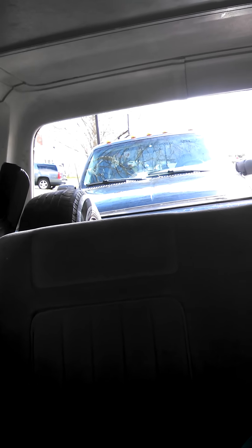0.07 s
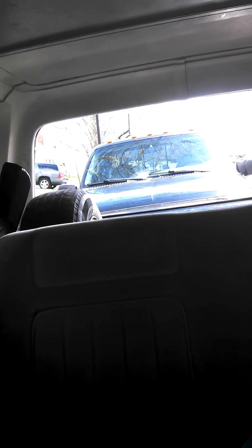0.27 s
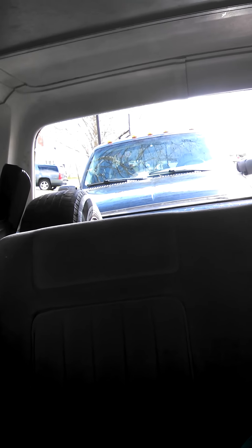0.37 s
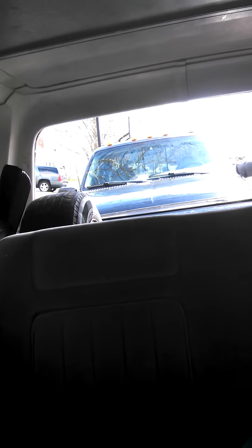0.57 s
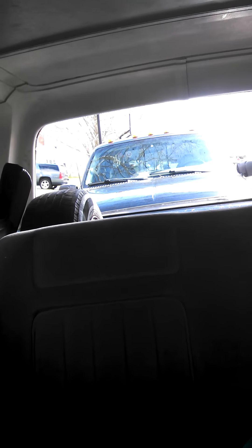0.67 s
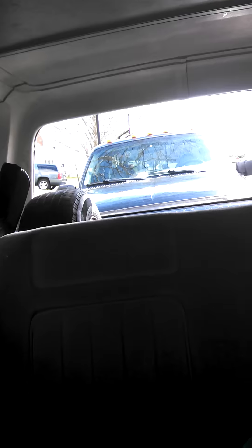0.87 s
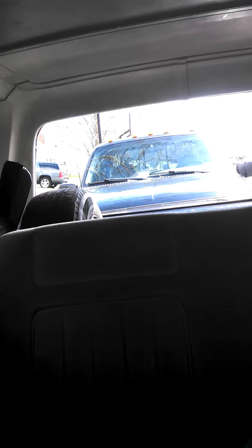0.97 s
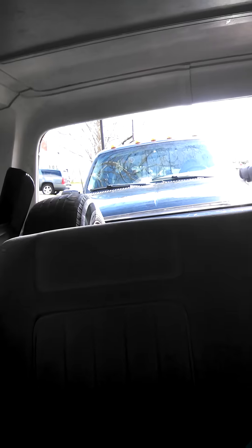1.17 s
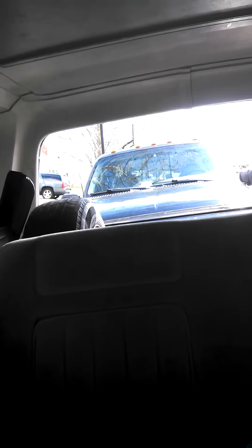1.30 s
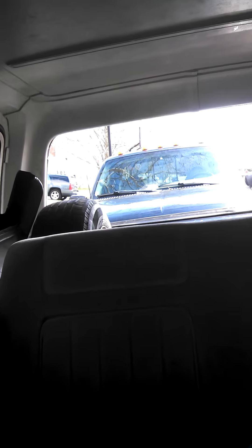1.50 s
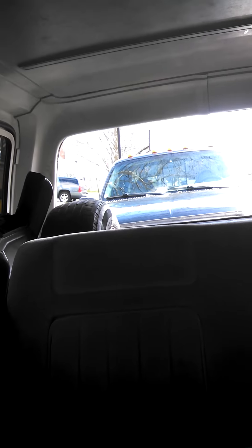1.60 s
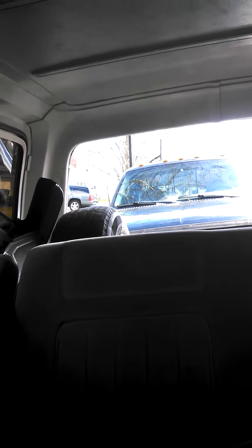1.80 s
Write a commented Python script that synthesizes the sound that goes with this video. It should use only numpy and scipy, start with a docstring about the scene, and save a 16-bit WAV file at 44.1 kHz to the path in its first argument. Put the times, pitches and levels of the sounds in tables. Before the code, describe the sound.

An engine runs at a fast idle throughout, a low, throbbing drone heard inside a standing vehicle, with faint hiss, a slight whirr and soft rustles. At about 0.5 seconds a small hard catch clicks sharply. A lighter tick follows near 0.9 seconds, then a louder click at about 1.2 seconds. The rumble dips after it and creeps back, with a few faint ticks, until nearly 2 seconds.

```python
"""Inside a standing vehicle, the engine runs at a fast idle: its periodic firing gives a low, throbbing
drone of harmonics over cabin rumble, faint hiss and a whirr. Something small and hard, like a catch,
clicks twice among light ticks and soft rustles; each impact excites the damped modes of catch and panel
and scatters round the cabin. The louder second click makes the recorder's gain control duck the rumble,
which then creeps back."""
import sys
import numpy as np
from scipy import signal
from scipy.fft import rfft, irfft, next_fast_len
from scipy.io import wavfile

SR = 44100
rng = np.random.default_rng(int(sys.argv[2]) if len(sys.argv) > 2 else 0)


def pcm_store(signal):
    """Save signal as 16-bit PCM."""
    levels = np.round(np.clip(np.atleast_2d(signal), -1, 1) * 32767)
    wavfile.write(sys.argv[1], SR, levels.astype(np.int16).T)


N = 81585
T = np.arange(N) / SR

# Engine firing rate: time_s, rate_hz
FIRING_RATE = [(0, 65.9), (.24, 63.22), (.32, 63.4), (.4, 64.4), (.5, 62.6), (.64, 64.47), (.8, 64.84),
               (.88, 66.65), (.99, 64.28), (1.12, 66.08), (1.23, 63.18), (1.36, 66.12), (1.47, 64.17),
               (1.6, 66.62), (1.74, 65.71), (1.85, 67.4)]
# Firing harmonics: time_s, first_db, second_db, third_db
HARMONIC_LEVELS = [(0, -60, -45.5, -67), (.1, -43.5, -42.5, -45.5), (.2, -48.5, -43.5, -58.5),
                   (.34, -40, -36.5, -53), (.44, -45.5, -41.5, -51), (.51, -40.5, -37.5, -47.5),
                   (.6, -45.5, -37.5, -47), (.68, -45, -44, -45), (.82, -41.5, -42, -45),
                   (.92, -44, -43.5, -47.5), (1.07, -40.5, -41.5, -45.5), (1.16, -41, -43, -38),
                   (1.23, -45.5, -42.5, -54), (1.46, -45.5, -45.5, -47.5), (1.57, -42, -44, -48),
                   (1.66, -46, -47.5, -48.5), (1.82, -43.5, -42, -45)]
# Their balance, left minus right: first_db, second_db, third_db
HARMONIC_PAN_DB = [7, 4, -7]
# Weaker engine tones: crank_multiple, level_db, left_minus_right_db
CRANK_ORDERS = [(4, -56.5, 0.5), (5, -54.5, -2.5), (10, -53.5, 5.5), (11, -57.5, -2), (13, -60.5, -9),
                (15, -63.5, 4.5), (17, -59, 5.5), (20, -64, 1), (21, -69.5, 11.5)]
# Phase between the ears in the cabin's standing waves: frequency_hz, left_lead_rad
STANDING_WAVE_LEAD = [(64, 1.0), (105, -0.87), (130, -1.14), (200, -1.29), (400, -1.38)]
# Likeness of the cabin's noise at the two ears: frequency_hz, correlation
EAR_CORRELATION = [(60, 0.89), (150, 0.69), (300, -0.059), (600, 0.31), (1050, 0.76), (1550, 0.98),
                   (2200, -0.7), (4000, 0.23), (8000, -0.13), (12000, -0.15)]
# Envelopes of rumble and whirr: time_s, gain_db
RUMBLE_ENVELOPE = [(0, 0), (.2, 0.5), (.45, 4.5), (.6, 0), (.8, 2.5), (1.0, 3.5), (1.15, 5), (1.3, 3),
                   (1.6, 0), (1.85, 1)]
WHIRR_ENVELOPE = [(0, -60), (.05, -73), (.08, -60), (.15, -70), (.25, -61.5), (.35, -56), (.5, -53.5),
                  (.65, -57.5), (.9, -67), (1.4, -68), (1.58, -60.5), (1.85, -65)]
# Thin whine within the whirr: time_s, pitch_hz
WHINE_GLIDE = [(0, 1290), (.3, 1345), (.48, 1391), (.75, 1335), (1.85, 1243)]
# Rubbing strokes: start_s, body_db, swish_db, length_s
RUSTLE_STROKES = [(0, -53, -64.5, .11), (.205, -68, -62, 0.042), (.27, -62, -67, 0.036),
                  (.445, -54, -60.5, 0.073), (0.562, -54.5, -71, .11), (.705, -53, -66, 0.065),
                  (0.774, -56.5, -78, 0.16), (0.922, -46.5, -55, .1), (1.011, -51.5, -63, 0.043),
                  (1.077, -49.5, -75, 0.11), (1.301, -55, -76, 0.059), (1.434, -62, -63.5, 0.033),
                  (1.543, -52, -66, 0.074), (1.62, -56, -82, 0.051), (1.694, -60, -62, 0.039),
                  (1.74, -62, -64, 0.06), (1.809, -53, -70, 0.064)]
# Impacts of the catch: start_s, ring_db, knock_db
IMPACTS = [(.5114, -11, -9.5), (.5137, -8, -9), (.5154, -17, -9.5), (.5173, -14, -9), (0.5223, -18, -21),
           (0.5292, -44, -23), (0.744, -45, -42), (.908, -53, -24.5), (.9224, -32, -15),
           (0.9453, -37, -25.5), (1.1705, 0, -6), (1.176, -20.5, -11), (1.181, -13, -10), (1.42, -47, -35),
           (1.572, -50, -31)]
# Modes of the catch and of the panel that carries it: pitch_hz, relative_db, t60_s
CATCH_MODES = [(8700, -28, .006), (12070, 1, .0062), (12450, -9, .011), (14220, -15, .012),
               (15300, -17, .009)]
PANEL_MODES = [(327, -32, .06), (517, -35, .06), (660, -31, .055), (860, -29, .075), (1360, -27, .06),
               (1500, -32, .04), (2060, -33, .035), (2480, -35, .04), (3596, -35, .05), (3984, -35, .06),
               (4290, -35, .06), (6826, -39, .04), (7320, -33, .045)]
# Spectral shapes of the noises: frequency_hz, relative_density_db
RUMBLE_SPECTRUM = [(15, -64.5), (28, -45), (36, -26), (48, 0.5), (100, 1), (160, -1.5), (230, 0.5),
                   (300, -1.5), (370, -3), (520, -12.5), (690, -10), (1000, -21), (1500, -26.5),
                   (2000, -27), (3000, -43)]
HISS_SPECTRUM = [(1500, 6), (2400, 2.5), (4000, 6), (6000, -.5), (7500, 0), (10500, -5), (15300, -3),
                 (16200, -19)]
WHIRR_SPECTRUM = [(700, -29), (1050, -3.5), (1250, 1), (1400, -1.5), (1560, 1), (1700, -13), (2100, -47)]
RUSTLE_BODY_SPECTRUM = [(150, 4), (400, 27), (750, 19), (1300, 8), (2200, -4), (4000, 7), (15000, -43.5)]
SWISH_SPECTRUM = [(1000, -3), (3000, -1.5), (7500, 2.5), (10500, -1), (15300, -5), (16500, -15)]
KNOCK_SPECTRUM = [(150, -14), (500, 11.5), (850, 1.5), (1400, 3.5), (1800, -4), (2400, -4), (4200, -3),
                  (6000, -6), (8000, -0.5), (15000, -4)]
RING_TAIL_SPECTRUM = [(9000, -39), (11000, -27), (12060, -1), (12500, -8), (13400, -20), (15200, -13),
                      (16500, -26.5)]

CONTACT_S, CATCH_PAN_DB = .0007, -3


def from_db(db):
    """Amplitude grows tenfold for every 20 decibels."""
    return 10 ** (np.asarray(db) / 20)


def unit_power(x):
    """Division by the root mean square gives unit power."""
    return x / np.sqrt(np.mean(x ** 2) + 1e-20)


def in_time(rows):
    """Linear interpolation in time."""
    return np.interp(T, *np.transpose(rows))


def at_hz(points, hz):
    """Interpolation on a logarithmic frequency axis."""
    frequencies, values = np.transpose(points)
    return np.interp(np.log(hz), np.log(frequencies), values)


def pan(db):
    """Interaural level difference: two gains, the left higher by db."""
    return from_db(np.array([[db], [-db]]) / 2)


def drift(rate_hz):
    """Random modulation: low-passed noise of unit power."""
    hop, settle = 40, 2000
    pole = np.exp(-2 * np.pi * hop * rate_hz / SR)
    white = rng.standard_normal(N // hop + settle + 2)
    slow = signal.lfilter([1], [1, -2 * pole, pole * pole], white)[settle:]
    return np.interp(np.arange(N) / hop, np.arange(len(slow)), unit_power(slow))


def noise(spectrum):
    """Partial coherence: mid and side noise mix to the cabin's correlation between the ears."""
    size = next_fast_len(N)
    hz = np.maximum(np.fft.rfftfreq(size, 1 / SR), 1)
    mid, side = rfft(rng.standard_normal((2, size)))
    alike = at_hz(EAR_CORRELATION, hz)
    ears = np.sqrt(1 + alike) * mid + np.sqrt(1 - alike) * side * [[1], [-1]]
    return unit_power(irfft(ears * from_db(at_hz(spectrum, hz)), size)[:, :N])


def tone(phase, depth, waver_hz=8.1):
    """Narrowband modulation: a random phasor makes a sinusoid waver in level and phase."""
    waver = depth * (drift(waver_hz) + 1j * drift(waver_hz))
    return np.sqrt(2) * np.real((1 + waver) * np.exp(1j * phase))


def swells(rows):
    """Superposition of half-sine envelopes."""
    return sum(from_db(db) * np.sin(np.pi * np.clip((T - start) / length, 0, 1))
               for start, db, length in rows)


def decay(start_s, t60_s):
    """Exponential decay: a sudden onset, then a fall of 60 dB in t60_s."""
    return (T >= start_s) * from_db(-60 * np.clip((T - start_s) / t60_s, 0, 5))


def damped_mode(age_s, hz, t60_s):
    """Free vibration of a damped oscillator."""
    return np.exp(-np.log(1000) * age_s / t60_s) * np.sin(2 * np.pi * hz * age_s)


def engine(rumble_db=-47, throb_depth=.11, firings_per_turn=3):
    """Periodic excitation: firing modulates the rumble and gives harmonics; crank tones waver more."""
    firing_hz = in_time(FIRING_RATE)
    phase = 2 * np.pi * np.cumsum(firing_hz) / SR

    def phase_at_ears(multiple):
        """Standing waves shift a partial's phase between the ears."""
        lead = at_hz(STANDING_WAVE_LEAD, multiple * firing_hz.mean())
        return multiple * phase + lead * np.array([[.5], [-.5]])

    throb = 1 + throb_depth * np.cos(phase)
    out = from_db(rumble_db + in_time(RUMBLE_ENVELOPE)) * noise(RUMBLE_SPECTRUM) * throb
    times, *levels = np.transpose(HARMONIC_LEVELS)
    for harmonic, (db, pan_db) in enumerate(zip(levels, HARMONIC_PAN_DB), 1):
        gain = from_db(np.interp(T, times, db)) * pan(pan_db)
        out += gain * tone(phase_at_ears(harmonic), depth=.07)
    for order, db, pan_db in CRANK_ORDERS:
        order_phase = phase_at_ears(order / firings_per_turn) + rng.uniform(0, 2 * np.pi)
        out += from_db(db) * pan(pan_db) * tone(order_phase, depth=.41)
    return out


def air(hiss_db=-63.5, flicker_db=2, whine_relative_db=-3.5):
    """Amplitude modulation: broadband hiss flickers; a whirr and its fluttering whine swell and fade."""
    flutter = drift(rate_hz=5.3) + 1j * drift(rate_hz=5.3)
    whine = np.real(flutter * np.exp(2j * np.pi * np.cumsum(in_time(WHINE_GLIDE)) / SR))
    hiss = from_db(hiss_db + flicker_db * drift(rate_hz=17)) * noise(HISS_SPECTRUM)
    whirr = noise(WHIRR_SPECTRUM) + from_db(whine_relative_db) * whine
    return hiss + from_db(in_time(WHIRR_ENVELOPE)) * whirr


def rustles(grain_db=4):
    """Friction noise: each short rub has a dull body and a grainy, airy swish."""
    starts, body_db, swish_db, lengths = np.transpose(RUSTLE_STROKES)
    body = swells(zip(starts, body_db, lengths)) * noise(RUSTLE_BODY_SPECTRUM)
    grain = unit_power(from_db(grain_db * drift(rate_hz=120)))
    swish = swells(zip(starts, swish_db, lengths)) * grain * noise(SWISH_SPECTRUM)
    return body + swish


def catch(right_lead_s=.000322, spread_db=1):
    """Impact excitation: each contact rings the catch's high modes, reaching the right ear first."""
    out = np.zeros((2, N))
    for start, ring_db, _ in IMPACTS:
        ringing = (T > start) & (T < start + .05)
        age = np.maximum(T[ringing] - start - np.array([[right_lead_s], [0]]), 0)
        attack = np.sin(np.pi / 2 * np.minimum(age / CONTACT_S, 1)) ** 2
        for hz, db, t60 in CATCH_MODES:
            strength = from_db(ring_db + db + rng.normal(0, spread_db))
            out[:, ringing] += strength * attack * damped_mode(age, hz, t60)
    return out * pan(CATCH_PAN_DB)


def panel(gain_db=-7.5, spread_db=2.3):
    """Modal resonance: each knock draws a hollow clack from the panel, a little different at each ear."""
    out = np.zeros((2, N))
    for start, _, knock_db in IMPACTS:
        ringing = (T > start) & (T < start + .12)
        age = T[ringing] - start
        for hz, db, t60 in PANEL_MODES:
            strength = from_db(gain_db + knock_db + db + rng.normal(0, spread_db, (2, 1)))
            polarity = rng.choice([-1, 1])
            out[:, ringing] += polarity * strength * damped_mode(age, hz, t60)
    return out


def cabin_scatter(knock_gain_db=-26.5, crack_gain_db=-37, ring_gain_db=-19.5):
    """Diffuse reverberation: knock, crack and ring scatter off seats and panels and add in power."""
    knock_power, ring_power = np.zeros((2, N))
    for start, ring_db, knock_db in IMPACTS:
        knock_power += (from_db(knock_db + knock_gain_db) * decay(start, t60_s=.087)) ** 2
        knock_power += (from_db(knock_db + crack_gain_db) * decay(start, t60_s=.0062)) ** 2
        ring_power += (from_db(ring_db + ring_gain_db) * decay(start + CONTACT_S, t60_s=.04)) ** 2
    knock = np.sqrt(knock_power) * noise(KNOCK_SPECTRUM)
    ring = np.sqrt(ring_power) * noise(RING_TAIL_SPECTRUM)
    return (knock + ring) * pan(CATCH_PAN_DB)


def scene():
    """Superposition: the pressures of all sources add in the cabin."""
    return engine() + air() + rustles() + catch() + panel() + cabin_scatter()


def record(dry, threshold_db=-12, slope=.83, attack_s=.0027, recovery_db_per_s=7, stopband_hz=17500):
    """Automatic gain control: peaks duck the gain, which recovers slowly; a low-pass cuts the top."""
    peak_db = 20 * np.log10(np.abs(dry).max(axis=0) + 1e-9)
    reduction_db = slope * np.maximum(peak_db - threshold_db, 0)
    recovery_db = recovery_db_per_s * T
    held_db = np.maximum.accumulate(reduction_db + recovery_db) - recovery_db
    pole = np.exp(-1 / (attack_s * SR))
    ducked = dry * from_db(-signal.lfilter([1 - pole], [1, -pole], held_db))
    lowpass = signal.cheby2(12, 70, stopband_hz, fs=SR, output="sos")
    return signal.sosfilt(lowpass, ducked)


dry = scene()
out = record(dry)
pcm_store(out)
```